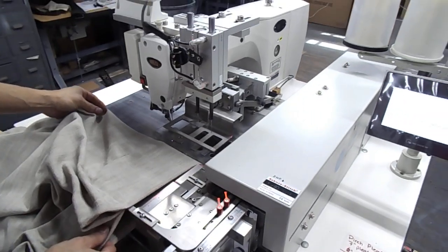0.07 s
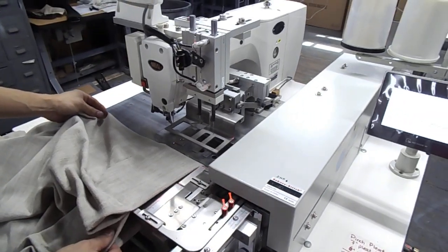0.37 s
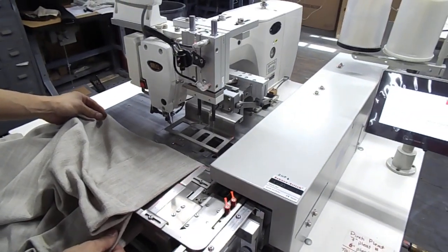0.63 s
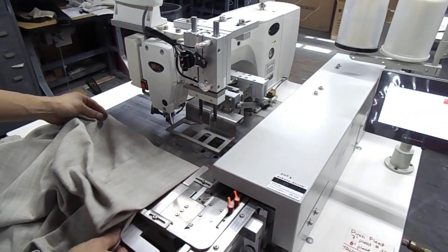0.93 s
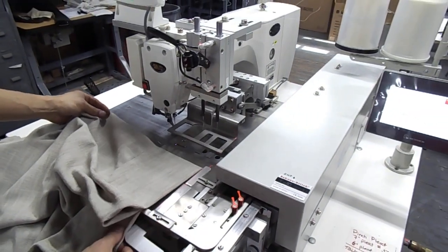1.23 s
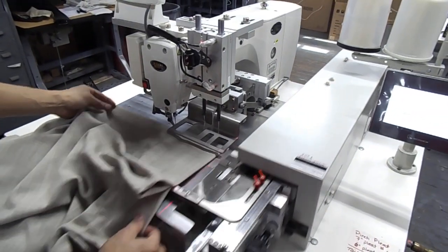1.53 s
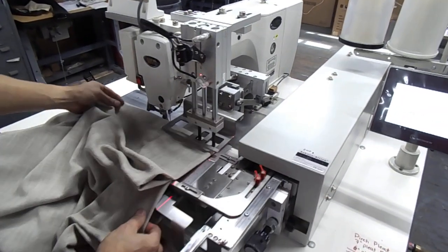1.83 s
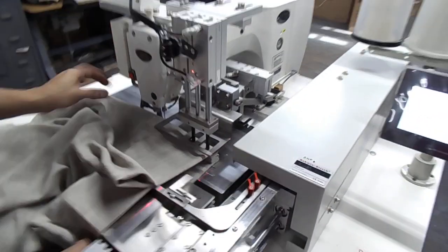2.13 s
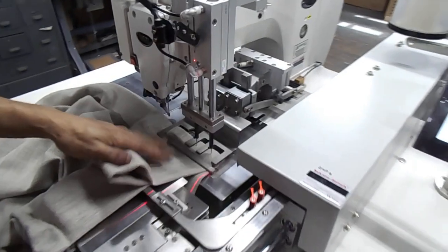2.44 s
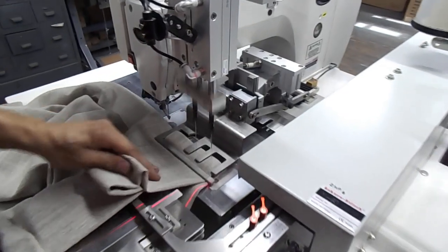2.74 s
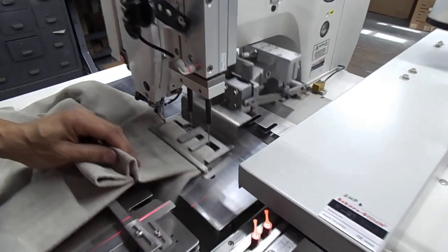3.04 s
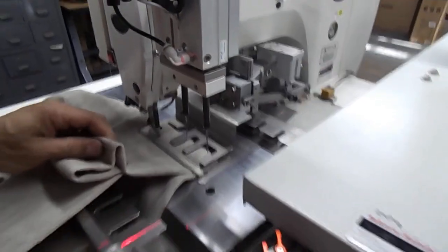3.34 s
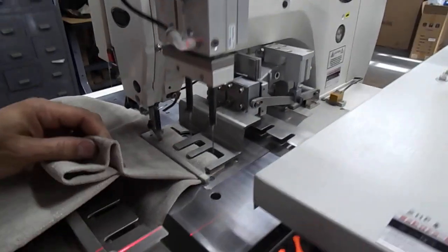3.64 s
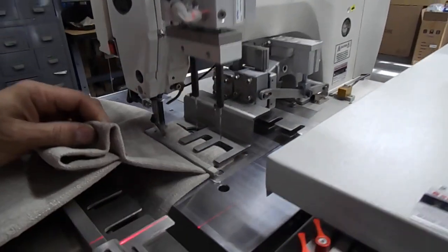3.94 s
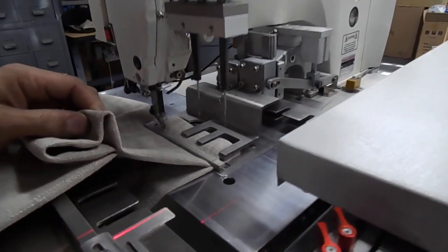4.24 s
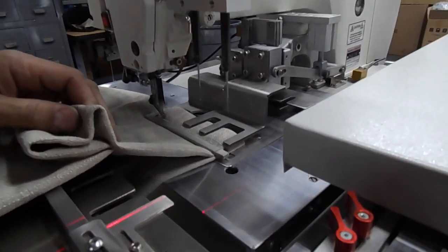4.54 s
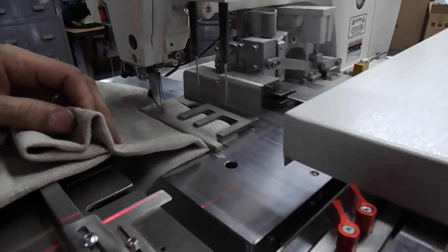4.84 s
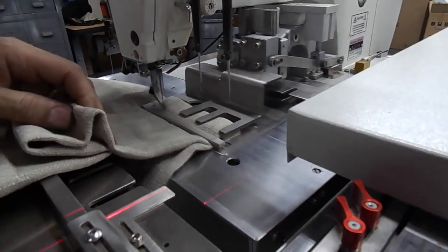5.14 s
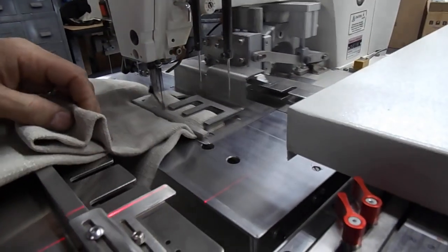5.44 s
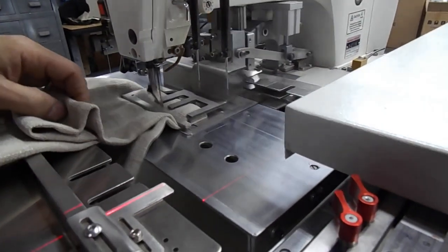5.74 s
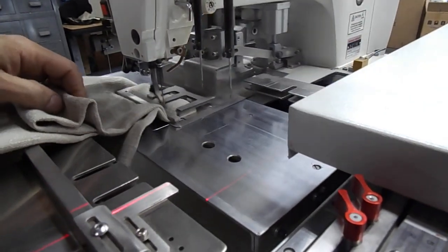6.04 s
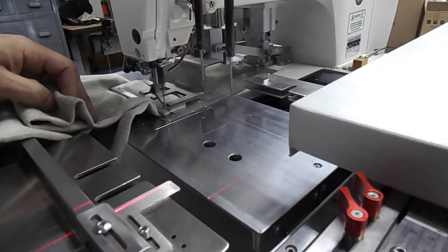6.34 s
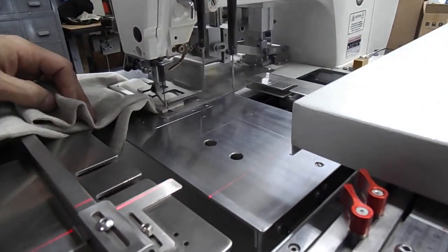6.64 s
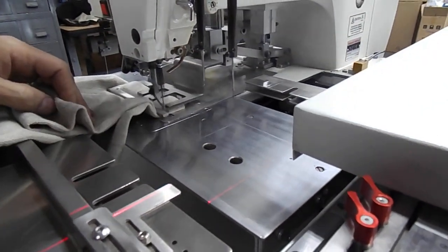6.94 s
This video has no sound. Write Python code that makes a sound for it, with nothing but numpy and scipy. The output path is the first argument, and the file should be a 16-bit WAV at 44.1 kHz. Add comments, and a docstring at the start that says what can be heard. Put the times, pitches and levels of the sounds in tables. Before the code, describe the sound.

Air hisses, heavy bumps and steel clicks from an industrial sewing machine lead to five short feed steps and rapid clattering stitching.

```python
"""First come hisses of air and heavy bumps, over a workshop's hum: an automatic pleating sewing machine.
Valves let out air and carriages slide and stop, shaking the steel table. The cloth clamp
snaps down and the feed moves forward in five steps. Then the sewing head clatters as its parts knock
on every turn: 1900 stitches a minute, dropping to 1000 for the last ones before it stops."""
import sys
import numpy as np
from scipy import signal
from scipy.fft import rfft, irfft, next_fast_len
from scipy.io import wavfile
from scipy.ndimage import uniform_filter1d, map_coordinates

SR = 44100
rng = np.random.default_rng(int(sys.argv[2]) if len(sys.argv) > 2 else 0)


def write(x):
    x = np.atleast_2d(x).T
    wavfile.write(sys.argv[1], SR, np.round(np.clip(x, -1, 1) * 32767).astype(np.int16))


N = 313110
T = np.arange(N) / SR

# Thuds and clanks of carriages stopping or rumbling and of air valves opening.
# Each row: time in seconds, then thud, clank and click in dB.
BUMPS = [(0.771, -24.5, -50, -50), (.818, -13.5, -22.5, -23), (1.054, -17.5, -41, -50),
         (1.162, -21.5, -37, -54), (1.53, -29, -39.5, -39), (1.591, -23.5, -43, -44),
         (1.76, -21.5, -32, -25), (2.08, -16.5, -33, -33), (2.129, -14.5, -24, -17),
         (2.502, -33.5, -55, -39), (2.738, -21, -24.5, -35), (2.981, -31.5, -36.5, -38)]
FEED_START_S, FEED_PERIOD_S, FEED_STEPS = 3.125, 0.2925, 5
STEP_TIMES = FEED_START_S + FEED_PERIOD_S * np.arange(FEED_STEPS)


def amp(db):
    """Turn decibels (dB) into a number to multiply by."""
    return 10 ** (np.asarray(db) / 20)


def unit(x):
    """Scale a sound to an average (rms) level of 1."""
    return x / np.sqrt(np.mean(x ** 2) + 1e-20)


def along(points, hz):
    """Read between rows of frequency and value, on a scale of octaves."""
    freqs, values = np.transpose(points)
    return np.interp(np.log(hz + 1), np.log(freqs + 1), values)


def wobble(rate):
    """A smooth random curve through `rate` points a second."""
    return map_coordinates(rng.standard_normal(int(N * rate / SR) + 4), [T * rate])


def noise(spectrum, size=N, lumps_db=0, lump_hz=400, peaks=()):
    """Noise with a given tone colour, plus optional random lumps and fixed peaks in its spectrum."""
    m = next_fast_len(size)
    hz = np.fft.rfftfreq(m, 1 / SR)
    lumps = map_coordinates(rng.uniform(-1, 1, size=512), [hz / lump_hz], order=1, mode="mirror")
    peaks_db = sum(boost / (1 + (2 * (hz - centre) / width) ** 2) for centre, width, boost in peaks)
    db = along(spectrum, hz) + lumps_db * lumps + peaks_db
    return unit(irfft(rfft(rng.standard_normal(m)) * amp(db), m)[:size])


def fade(t, t60):
    """Die away by 60 dB in t60 seconds, the "fade time"."""
    return np.exp(-np.log(1000) * t / t60)


def ring(modes, t, blur):
    """A struck part's fading tones, new in strength at each hit; loose joints make them waver."""
    phase = lambda: 2 * np.pi * rng.random() + blur * np.cumsum(rng.standard_normal(len(t)))
    return sum(amp(db + rng.normal(0, 3.3)) * fade(t, t60) * np.sin(2 * np.pi * hz * t + phase())
               for hz, db, t60 in modes)


def add(track, s, sound):
    """Mix a sound into a track at s seconds."""
    part = track[max(round(s * SR), 0):][:len(sound)]
    part += sound[:len(part)]


def convolve(x, response):
    """Let every sample of x set off a copy of the response."""
    return signal.fftconvolve(x, response)[:N]


def workshop(fan_db=-58):
    """Fans rush and idling motors hum."""
    # Fan noise, then motor tones. Each row: frequency in Hz, level in dB.
    fan_colour = [(15, -55), (25, -39), (111, -1.5), (354, -5), (1940, -22.5), (2280, -22), (2480, -23),
                  (8830, -26), (16000, -29)]
    motor_tones = [(240, -67), (401, -68), (2205, -76.5)]
    hum = sum(amp(db) * np.sqrt(2) * np.sin(2 * np.pi * hz * T) for hz, db in motor_tones)
    return amp(fan_db) * noise(fan_colour) + hum


def room_echo(x):
    """The workshop echoes; high sounds die sooner than low ones."""
    # The echo's length. Each row: frequency in Hz, fade time in seconds.
    fade_times = [(200, 0.92), (1500, 0.49), (6000, 0.14), (14000, 0.18)]
    hz, t, bands = signal.stft(rng.standard_normal(SR), SR, nperseg=256)
    tail = signal.istft(bands * fade(t, along(fade_times, hz)[:, None]), SR, nperseg=256)[1]
    return convolve(x, np.pad(tail / np.linalg.norm(tail), (SR // 200, 0)))


def slides_and_rush(run_up_s=0.1, coast_t60=0.27, step_s=0.12, step_db=-54, grit_db=0.97):
    """Carriages rub grittily on their rails, swelling and fading, along with a softer rush."""
    # Loud carriage runs, plus a soft steady rush under the venting air and feed.
    # Each row: start and end in seconds, full level in dB.
    rushes = [(.65, 0.88, -31.5), (.945, 1.051, -29.5), (1.1, 1.695, -45.5), (1.79, 2.24, -31.5),
              (2.3, 4.6, -54.5), (2.94, 3.046, -41.5)]
    # Their tone colour. Each row: frequency in Hz, level in dB.
    rush_colour = [(88, -37), (150, -4), (275, 4.5), (702, -1), (1940, -6), (2360, -9), (2920, -5.5),
                   (10800, -14), (16000, -15)]
    steps = [(s, s + step_s, step_db) for s in STEP_TIMES]
    level = np.zeros(N)
    for starts, ends, db in [*rushes, *steps]:
        run_up = np.clip((T - starts) / run_up_s, 0, 1)
        level += amp(db) * run_up * fade(np.maximum(T - ends, 0), coast_t60)
    return level * amp(grit_db * wobble(270)) * noise(rush_colour)


def air_vents(rise_s=0.0094, fall_s=0.01, sag_db_per_s=14.5):
    """Air hisses out of valves, fading as the pressure drops; echoes in each outlet colour it."""
    # Puffs of air. Each row: opening and closing time in seconds, level in dB, outlet pitch in Hz.
    puffs = [(0.634, .858, -40, 3220), (0.934, 1.064, -38.5, 3530), (1.133, 1.593, -43.5, 1410),
             (1.584, 1.773, -43.5, 3600), (1.764, 2.344, -38.5, 2130), (2.498, 2.748, -43.5, 3500),
             (2.779, 3.104, -48.5, 2150), (3.147, 3.615, -57, 4760)]
    # The hiss. Each row: frequency in Hz, level in dB.
    hiss_colour = [(800, 3), (2000, -3), (3200, 22), (7000, 18), (10500, 23), (13000, 20.5), (15500, -4)]
    air, hz, t = np.zeros(N), np.fft.rfftfreq(2 * SR, 1 / SR), T[:2 * SR]
    for opens, closes, db, outlet_hz in puffs:
        outlet = 1 / (1 - 0.45 * np.exp(-2j * np.pi * hz / outlet_hz))  # a row of broad peaks
        hiss = noise(hiss_colour, size=2 * SR, lumps_db=8, lump_hz=234.4)
        jet = unit(irfft(rfft(hiss) * outlet, 2 * SR))
        valve = (1 - np.exp(-t / rise_s)) * np.exp(-np.maximum(t - (closes - opens), 0) / fall_s)
        add(air, opens, jet * valve * amp(db - sag_db_per_s * t))
    return air


def table_thuds(t60=0.19, ring_db=-5, swell_s=0.012, step_lag_s=0.02, step_db=-31,
                rebound_s=0.062, rebound_loss_db=7):
    """Each bump and feed step shakes the steel table with a dull thud, then a softer rebound."""
    # The dull thump. Each row: frequency in Hz, level in dB.
    thump_colour = [(60, -25), (120, -17.5), (200, 0), (285, 3.5), (420, -7), (900, -16), (4000, -67)]
    # The table's ringing panels. Each row: pitch in Hz, level in dB, fade time in seconds.
    panel_tones = [(289.3, -2.5, 0.75), (323, -16.5, 0.86), (378.5, -12, 0.85), (473, -13, 0.84),
                   (600, -17, 0.86), (686, -18, 0.98)]
    table, t = np.zeros(N), T[:SR]
    blows = [(s, db) for s, db, _, _ in BUMPS] + [(s + step_lag_s, step_db) for s in STEP_TIMES]
    rebounds = [(s + rebound_s, db - rebound_loss_db) for s, db in blows]
    for s, db in blows + rebounds:
        jolt = noise(thump_colour, size=SR) * fade(t, t60) + amp(ring_db) * ring(panel_tones, t, 0.035)
        add(table, s, amp(db) * (1 - np.exp(-t / swell_s)) * jolt)
    return table


def whirrs_and_squeaks(screw_s=0.045, screw_db=-44, screw_hz=(2300, 1492), width_hz=500, rise_s=0.0012):
    """The feed screw whirrs at each step, falling in pitch as it brakes, and sliding guides squeak."""
    # Squeaks. Each row: start and length in seconds, level in dB, first and last pitch in Hz.
    squeaks = [(1.984, 0.15, -38.5, 3300, 2610), (3.131, 0.06, -40.5, 1205, 2300)]
    track, t = np.zeros(N), T[:SR // 4]
    whirrs = [(s, screw_s, screw_db, *screw_hz) for s in STEP_TIMES]
    for s, length, db, first_hz, last_hz in [*whirrs, *squeaks]:
        hz = np.interp(t, [0, length], [first_hz, last_hz])
        grit = noise([(width_hz, 0), (4 * width_hz, -24)], size=len(t))
        shape = (1 - np.exp(-t / rise_s)) * np.exp(-(t / length) ** 4)
        add(track, s, amp(db) * shape * unit(grit * np.sin(2 * np.pi * np.cumsum(hz) / SR)))
    return track


def steel_hits(lag_per_step_s=0.0055, scatter_db=3.5, tick_clank_db=-57, tick_click_db=-50):
    """List the bumps, latch snaps and link knocks: time in seconds, clank and click in dB."""
    # Latches and clamp fingers snapping. Each row: time in seconds, clank and click in dB.
    latches = [(2.214, -46, -31), (2.266, -33.5, -30.5), (2.743, -28.5, -26.5), (2.769, -28.5, -27),
               (2.854, -42, -32.5), (3.182, -37.5, -27.5), (3.804, -35, -30), (4.595, -39.5, -43),
               (4.66, -34, -26.5)]
    # Links knocking in each feed step. Each row: delay in seconds, clank and click in dB.
    link_knocks = [(.028, -44.5, -36.5), (.094, -40, -42.5), (.135, -45.5, -44), (.223, -51.5, -47.5)]
    bumps = [(s, clank_db, click_db) for s, _, clank_db, click_db in BUMPS]
    vary = lambda db: db + rng.normal(0, scatter_db)
    knocks = [(s + delay + step * lag_per_step_s, vary(clank_db), vary(click_db))
              for step, s in enumerate(STEP_TIMES) for delay, clank_db, click_db in link_knocks]
    # slightly loose links tick while the feed steps
    tick_times = FEED_START_S + FEED_STEPS * FEED_PERIOD_S * rng.random(size=24)
    ticks = [(s, tick_clank_db, vary(tick_click_db)) for s in tick_times]
    return [*bumps, *latches, *knocks, *ticks]


def steel_clacks(clank_db=4, click_db=8, ring_db=-19, rise_s=0.00031):
    """Steel hits steel with a sharp click and a fuller clank, and the clamp plates ring."""
    # The clank, then the click. Each row: frequency in Hz, level in dB.
    clank_colour = [(100, -22), (300, -17), (700, 0.5), (1300, -5.5), (2500, -6), (4500, -12.5),
                    (9000, -33.5)]
    click_colour = [(1000, -25), (2500, -6), (4500, 0), (7000, -1), (12000, -4), (16000, -5)]
    # The clamp plates. Each row: pitch in Hz, level in dB, fade time in seconds.
    plate_tones = [(1350, 7, 0.27), (1950, -4, 1.2), (4460, 6, 0.15), (10100, 6, 0.33)]
    # Single parts ringing. Each row: start in seconds, pitch in Hz, level in dB, fade time in seconds.
    pings = [(.638, 3220, -34, 0.064), (0.822, 1103, -17, 0.12), (2.1, 8300, -33, 0.39),
             (2.13, 6180, -9.5, 0.017), (2.983, 1386, -28, 0.065), (3.183, 13400, -13, 0.013)]
    metal, t = np.zeros(N), T[:SR]
    attack, snap, clang = 1 - np.exp(-t / rise_s), fade(t, t60=0.019), fade(t, t60=0.08)
    for s, body_db, edge_db in steel_hits():
        clank = amp(clank_db) * noise(clank_colour, size=SR, lumps_db=11, lump_hz=155.3) * clang
        plates = amp(ring_db) * ring(plate_tones, t, blur=0.0555)
        click = amp(click_db) * noise(click_colour, size=SR, lumps_db=-13, lump_hz=650) * snap
        add(metal, s, attack * (amp(body_db) * (clank + plates) + amp(edge_db) * click))
    for s, hz, db, t60 in pings:
        add(metal, s, attack * ring([(hz, db, t60)], t, blur=0.091))
    return metal


def stitching(knock_db=-24, knock_t60=0.085, repeat_db=-9, rattle_db=-18, slow_rattle_db=-1,
              rise_s=0.0015, force_db=-1.5, db_per_doubling=3.5, scatter_db=1.75, slow_scatter_db=-5.5):
    """Four strokes a turn knock the sewing head and rattle its loose parts, harder at higher speed."""
    # The main shaft, one stitch a turn. Each row: time in seconds, turns done.
    shaft = [(4.657, 0), (4.731, 1), (6.2146, 48), (6.25, 49), (7.005, 61.58), (7.057, 61.71), (7.1, 62.2)]
    # Strokes of the needle bar, thread lever, hook and feed.
    # Each row: share of a turn, knock and rattle in dB, the rattle's fade time in seconds.
    strokes = [(0, -1.5, 6, 0.042), (.24, 4, -7.5, 0.089), (.51, 1.5, 0.5, 0.057), (.71, 1.5, -10, 0.029)]
    # The head's knock, the links' knock and the rattle. Each row: frequency in Hz, level in dB.
    head_colour = [(60, -45), (130, -15), (250, -3), (500, 0), (720, -0.5), (1100, -3), (1550, -1.5),
                   (1900, -2), (2500, -5.5), (4000, -16), (8000, -25), (16000, -18)]
    link_colour = [(700, -28), (1100, -6), (2000, -9), (5000, -1.5), (16000, -31)]
    rattle_colour = [(300, -11), (1000, 8.5), (2200, -4.5), (3200, 6.5), (4000, 4.5), (5500, 4), (6600, -1),
                     (8500, 1.5), (10500, 6), (12500, 4), (15500, -8)]
    # Where the arm rings, then the hook and needle plate. Each row: pitch and width in Hz, boost in dB.
    arm_peaks = [(245.7, 26, 12), (724, 68, 8.5)]
    hook_peaks = [(1985, 120, 17), (2500, 120, 11), (5670, 150, 2.5), (10300, 250, 4)]
    # The head shaking at full speed. Each row: shakes per turn, level in dB.
    shake_tones = [(1, -56), (2, -56), (3, -50), (4, -53), (5, -54), (8, -43), (9, -44), (10, -45),
                   (11, -46), (14, -48), (16, -46), (19, -48), (20, -45), (22, -38), (23, -37), (26, -45),
                   (29, -45)]
    shaft_s, shaft_turns = np.transpose(shaft)
    turns = np.interp(T, shaft_s, shaft_turns)
    speed = uniform_filter1d(np.gradient(turns), SR // 20)
    speed /= speed.max()
    fast = speed ** 2  # 0 at rest, 1 at full speed
    force = amp(force_db + db_per_doubling * np.log2(np.abs(speed) + 1e-6))
    head, t = np.zeros(N), T[:SR // 4]
    attack = 1 - np.exp(-t / rise_s)

    def loudness(blows, t60):
        """The level over time as the energy of the blows adds up and fades."""
        return np.sqrt(np.abs(convolve(blows ** 2, (attack * fade(t, t60)) ** 2)))

    for share, body_db, edge_db, rattle_t60 in strokes:
        times = np.interp(np.arange(share, shaft_turns[-1], 1), shaft_turns, shaft_s)
        at = np.clip((times * SR).astype(int), 0, N - 1)
        # at low speed, slack in the links matters more than each stroke's own force
        spread_db = scatter_db + slow_scatter_db * (1 - fast[at])
        blows = np.bincount(at, force[at] * amp(spread_db * rng.uniform(-1, 1, len(at))), N)
        # part of the knock is alike on every turn, part is always new
        alike = convolve(blows, noise(link_colour, size=len(t)) * attack * fade(t, knock_t60))
        fresh = loudness(blows, knock_t60) * noise(head_colour, peaks=arm_peaks)
        head += amp(knock_db + body_db) * (fresh + amp(repeat_db) * alike)
        loose_db = rattle_db + fast * edge_db + (1 - fast) * slow_rattle_db
        rattle = noise(rattle_colour, lumps_db=6.5, lump_hz=247.3, peaks=hook_peaks)
        head += amp(loose_db) * loudness(blows, rattle_t60) * rattle
    # unbalanced parts shake the head with the square of the speed
    for per_turn, db in shake_tones:
        level = fast * amp(db + wobble(15)) * np.sqrt(2)
        head += level * np.sin(2 * np.pi * (per_turn * turns + rng.random()))
    return head


def scene(echo_db=-9):
    """The machine close by; its sharper metal sounds and its stitching echo in the room."""
    metal = steel_clacks() + whirrs_and_squeaks()
    head = stitching()
    echo = room_echo(amp(echo_db) * (metal + head))
    return (metal + head + echo + table_thuds() + air_vents() + slides_and_rush() + workshop())[None]


def record(dry, bass_hz=66, top_hz=15750):
    """Thin out the deep bass and cut off the very highest treble."""
    m = next_fast_len(N + 8192)
    thin = signal.sosfilt(signal.butter(2, bass_hz, "high", fs=SR, output="sos"), dry)
    return irfft(rfft(thin, m) * (np.fft.rfftfreq(m, 1 / SR) < top_hz), m)[:, :N]


dry = scene()
out = record(dry)
write(out)
```